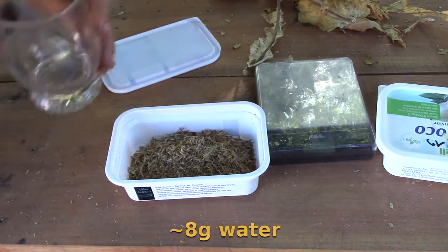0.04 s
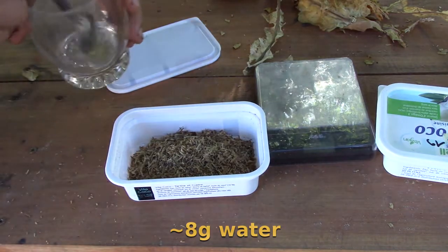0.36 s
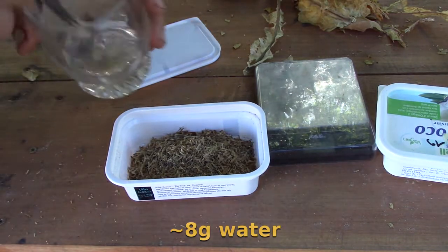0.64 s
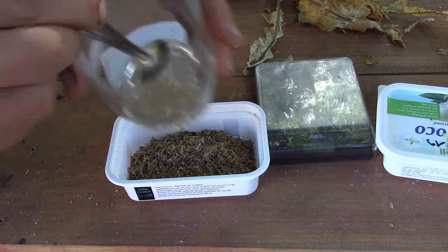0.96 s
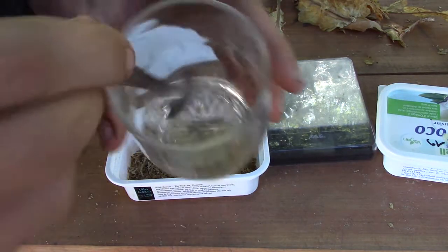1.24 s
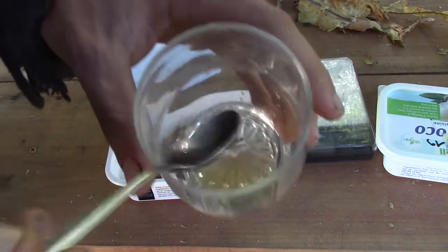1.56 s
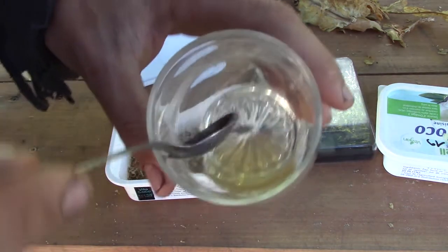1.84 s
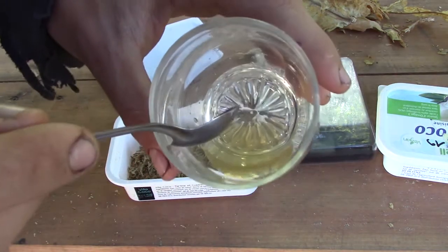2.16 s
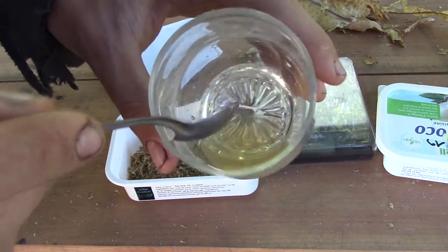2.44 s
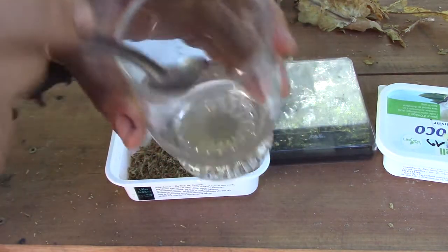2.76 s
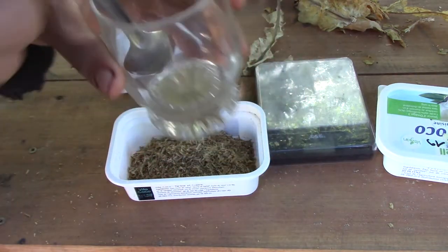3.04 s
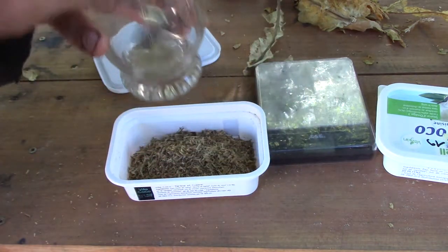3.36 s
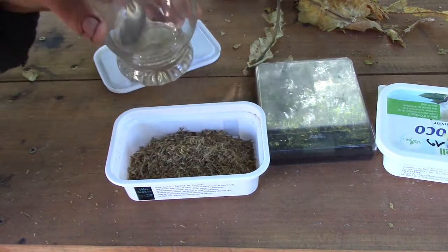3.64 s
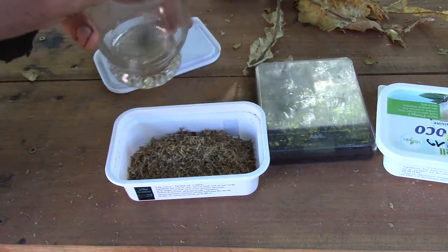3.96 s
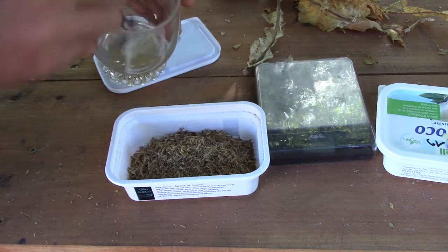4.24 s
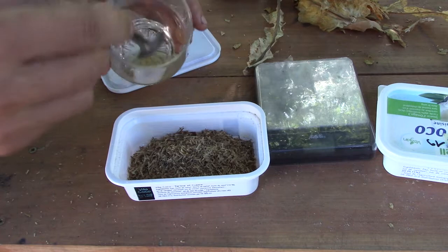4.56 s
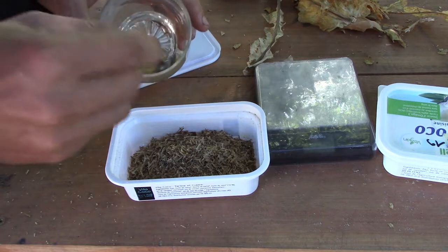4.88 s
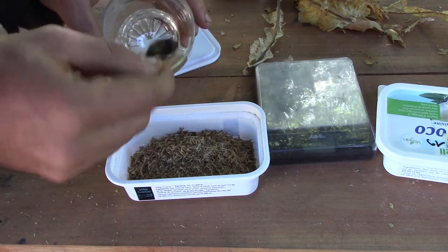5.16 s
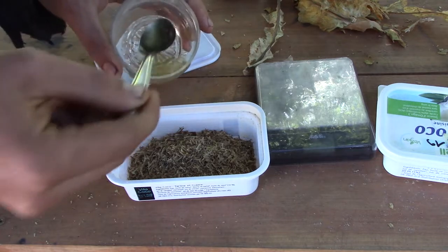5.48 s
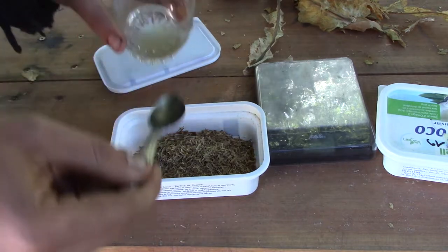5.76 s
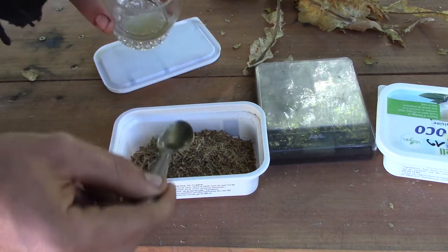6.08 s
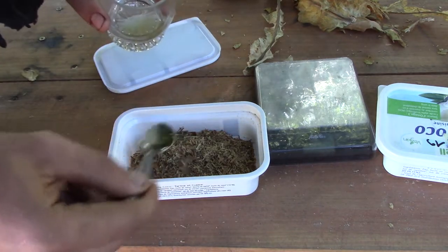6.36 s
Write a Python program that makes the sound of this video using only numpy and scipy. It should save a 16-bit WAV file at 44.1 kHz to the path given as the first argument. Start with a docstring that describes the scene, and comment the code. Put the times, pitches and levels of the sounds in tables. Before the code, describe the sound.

A steel teaspoon stirs a little water in a small hand-held glass. Quick, sharp taps on the base grow louder, mixed with short scrapes and pings. A few lighter clinks and rubs on the wall follow, then a second, softer run of taps with tiny wet ticks and bubbles, and one last faint clink. The sound is close and dry, outdoors, over a faint steady murmur of air.

```python
"""Outdoors, over a wooden table: a steel teaspoon stirs a small hand-held glass of water. The spoon's bowl taps
the thick base, skids, drags across it and slips free with a ping. The handle clinks and rubs on the wall and
rim, which the hand damps. Blows ring decaying modes; stick-slip drives the same modes. The water gives a few
tiny bubbles, and small clicks tick on the glass. Behind it all lies a steady distant murmur of air with a faint
hum."""
import sys
import numpy as np
from scipy import signal
from scipy.fft import rfft, irfft, next_fast_len
from scipy.io import wavfile

SR = 44100
rng = np.random.default_rng(int(sys.argv[2]) if len(sys.argv) > 2 else 0)


def master(y):
    """Save y as 16-bit WAV."""
    cut = np.clip(np.atleast_2d(y).T, -1, 1)
    pcm = np.round(cut * 32767)  # scale
    wavfile.write(sys.argv[1], SR, pcm.astype(np.int16))


N = 282681
RING_TIME_S = np.arange(SR // 6) / SR

# bowl hits base: (time [s], level [dB], tilt [dB/oct], pitch [x], grip looseness [x t60],
# spoon knock [dB], spoon ping [dB], bounce delay [ms], bounce strength [0-1])
BASE_TAPS = [(0.062, -25, -1, 0.99, 1.4, -42, -58, 1.43, 0.04),
             (0.2978, -19.5, -1, 1.0, 0.72, -50, -70, 1.41, 0.67),
             (0.5868, -22, 4, 1.065, 0.73, -23, -18, 1.036, 0.3),
             (0.7438, -10, 0, 1.015, 0.68, -21.5, -32, 1.51, 0.3),
             (0.92, -8.5, 1.5, 1, 0.83, -15.5, -39, 0.708, 0.38),
             (1.1071, -13.5, 1.5, 1.017, 0.54, -27, -37.5, 1.55, 0.45),
             (3.2407, -19, -0.5, 1.075, 0.97, -39, -42, 1.3, 0.8),
             (3.4069, -25, 4, 1.037, 0.86, -57, -31.5, 1.065, 0.3),
             (3.517, -21.5, -1, 1.04, 0.85, -39, -53, 1.337, 0.52),
             (3.6816, -26.5, 0, 1.01, 1, -36, -39, 1.16, 0), (3.873, -30, -0.4, 1, 0.82, -39, -63, 0.84, 0),
             (4.0703, -27.5, 1, 0.97, 1.28, -44, -52, 1.43, 0.45)]
# bowl pressed on the base: (frequency [Hz], level [dB], t60 [s])
BOWL_MODES = [(1587, 1.5, 0.0015), (2635, -9, 0.011), (2976, -20, 0.0357), (3580, 3, 0.0034),
              (4293, 1.5, 0.013), (5270, -19, 0.049), (6086, -10.5, 0.008), (6688, -15.5, 0.024),
              (7720, -6.5, 0.012), (8480, -22, 0.01), (9100, -14, 0.0073), (10236, -11.5, 0.029),
              (11310, -5, 0.014), (12070, -34, 0.0054), (13200, -9.5, 0.006)]
# glass wall: (frequency [Hz], level [dB], t60 [s])
WALL_MODES = [(1360, -30, 0.028), (1906, -24, 0.072), (2270, -23, 0.035), (2560, -7, 0.064),
              (2877, 2, 0.011), (3310, -5, 0.055), (3450, -20, 0.014), (3595, -5, 0.085),
              (3660, 13.5, 0.0028), (4890, -10.5, 0.061), (5110, -14, 0.092), (6460, -2.5, 0.058),
              (6860, -3, 0.016), (7980, 4.5, 0.0029), (8780, -13.5, 0.067), (10190, -3.5, 0.045),
              (10870, -13, 0.09), (11070, 0.5, 0.023), (13380, -13.5, .025), (14970, -13, 0.037)]
# spoon bending, rows knock, ping, top tone: (frequency [Hz], t60 [s])
SPOON_MODES = [(790, 0.014), (2887, 0.061), (5025, 0.084)]
# rim bending: (frequency [Hz], t60 [s])
RIM_MODES = [(1680, 0.19), (3515, 0.068)]


def base_taps():
    """The bowl clacks on the base and the spoon bends; a looser grip lifts its top tone."""
    out = np.zeros(N)
    for at_s, db, tilt, pitch, looseness, knock_db, ping_db, delay_ms, strength in BASE_TAPS:
        top_db = db - 13 + 16.5 * np.log2(looseness)
        clack = ring(BOWL_MODES, db, tilt, pitch, t60_scale=looseness)
        bending = bend(SPOON_MODES, [knock_db, ping_db, top_db])
        add(out, at_s, bounced(clack + bending, delay_ms, strength))
    return out


def bounced(blow, delay_ms, strength):
    """Two weaker bounces follow the blow within milliseconds."""
    size = next_fast_len(2 * len(blow))
    khz = np.fft.rfftfreq(size, 1000 / SR)
    bounce = strength * np.exp(-2j * np.pi * khz * delay_ms)
    return irfft(rfft(blow, size) * (1 + bounce + bounce ** 2 / 2), size)[:len(blow)]


def handle_clinks(lift_width=0.051, twin_ratio=1.013, twin_db=-9):
    """The handle strikes the wall; the glass is not quite round, so each wall mode has a twin."""
    # blows: (time [s], level [dB], tilt [dB/oct], t60 [x], frequency the contact point favours [Hz],
    # its lift [dB], low rim mode [dB], high rim mode [dB])
    clinks = [(1.469, -22.5, 2, 1.1, 2650, 1.4, -48, -36), (1.4818, -33.5, -1, 2.4, 2620, 3.6, -45, -41),
              (1.568, -41.5, 1.5, 1.16, 10600, 1.6, -58, -62),
              (1.6741, -41.5, 2.5, 0.95, 3620, 5.7, -54, -33),
              (2.5444, -27.5, 2, 0.87, 6450, 5.6, -51, -32), (2.9565, -55, -6, 0.85, 3120, 4, -37, -37),
              (2.9752, -51.5, -18, 0.84, 3070, 4, -40, -31.5),
              (3.0882, -36.5, 1, 0.85, 3120, 4, -38.5, -28),
              (4.9323, -42.5, -2.5, 0.51, 10140, 20.7, -65.5, -40)]
    out = np.zeros(N)
    hz, mode_db, t60_s = np.transpose(WALL_MODES)
    for at_s, db, tilt, t60_scale, favoured_hz, lift_db, *rim_db in clinks:
        lifted_db = mode_db + lift_db * np.exp(-(np.log(hz / favoured_hz) / lift_width) ** 2)
        modes = np.transpose([hz, lifted_db, t60_s])
        twins = np.transpose([hz * twin_ratio, lifted_db + twin_db, t60_s])
        wall = ring(np.vstack([modes, twins]), db, tilt, t60_scale=t60_scale)
        add(out, at_s, wall + bend(RIM_MODES, rim_db))
    return out


def release_pings(rise_s=0.0033, t60_s=0.053):
    """The spoon slips free and sings in one bending mode."""
    # slips: (time [s], level [dB], frequency [Hz])
    releases = [(0.782, -36, 2880), (0.999, -26.5, 2865), (1.178, -22, 2850), (3.421, -25.5, 2887),
                (3.603, -34.5, 2826), (3.784, -35, 2930), (4.077, -24.5, 5047)]
    out = np.zeros(N)
    onset = 1 - np.exp(-RING_TIME_S / rise_s)
    for at_s, db, hz in releases:
        add(out, at_s, ring([(hz, db, t60_s)]) * onset)
    return out


def base_slides(skid_rise_s=0.008, skid_fall_s=0.075, skid_tilt=-2.1, drag_rise_share=0.58):
    """The bowl skids after each tap and drags over the base between taps."""
    # drags: (peak time [s], length [s], level [dB], tilt [dB/oct], spoon knock [relative dB])
    drags = [(-0.007, 0.16, -36.5, -1, -24), (0.169, 0.11, -49, 3, 2), (0.782, 0.062, -43, -15, 19),
             (0.977, 0.13, -39, -1, 2), (1.17, 0.08, -34.5, -1.5, -3), (3.345, 0.085, -47, -5, -7),
             (3.403, 0.054, -42, -13, 12), (3.455, 0.079, -50, -4, -11), (3.584, 0.11, -43, -1.5, -1),
             (3.78, 0.054, -37, -1.5, -26), (3.971, 0.089, -41.5, -2.5, -7), (4.153, 0.1, -42.5, 3, -14)]
    strokes = []
    for at_s, db, tilt, *_ in BASE_TAPS:
        skid_db = -38.5 + 0.47 * db - 1.5 * tilt  # strong blows skid more, bright ones spring off
        strokes.append((at_s + skid_rise_s, skid_rise_s, skid_fall_s, skid_db, skid_tilt, (-18, -28)))
    for peak_s, length_s, db, tilt, knock_db in drags:
        rise_s = length_s * drag_rise_share
        strokes.append((peak_s, rise_s, length_s - rise_s, db, tilt, (knock_db, knock_db - 4)))
    return friction(strokes, BOWL_MODES, SPOON_MODES, catches_per_s=1500, spread_db=5.5, chatter_db=3.5,
                    flatten=0.3, grit=0.3, t60_scale=1.0, wander=0.041, patchy_db=4.0)


def wall_rubs(rise_share=0.16):
    """The handle rubs the wall, biting at once and dying away."""
    # rubs: (peak time [s], length [s], level [dB], tilt [dB/oct], high rim mode [relative dB])
    rubs = [(1.493, 0.06, -30, -5, -25), (1.576, 0.086, -48.5, -3, -27), (1.843, 0.2, -63, 0, -3),
            (2.022, 0.024, -47.5, -12, -1), (2.313, 0.017, -53, -11, -2), (2.977, 0.12, -45.5, 1.5, 5)]
    strokes = []
    for peak_s, length_s, db, tilt, rim_db in rubs:
        rise_s = length_s * rise_share
        strokes.append((peak_s, rise_s, length_s - rise_s, db, tilt, (rim_db - 11.5, rim_db)))
    return friction(strokes, WALL_MODES, RIM_MODES, catches_per_s=3000, spread_db=3.5, chatter_db=3.0,
                    flatten=0.4, grit=0.076, t60_scale=0.16, wander=0.033, patchy_db=6.5)


def friction(strokes, modes, bending_modes, catches_per_s, spread_db, chatter_db, flatten, grit,
             t60_scale, wander, patchy_db, depth_db=20.5):
    """Steel sticks and slips on glass; the moving contact shifts the modes' pitch and strength."""
    out = np.zeros(N)
    hz, mode_db, t60_s = np.transpose(modes)
    sizes = gain_of(spread_db * np.minimum(rng.exponential(1, N), 3)) * rng.choice([-1, 1], N)
    catches = sizes * (rng.random(N) < catches_per_s / SR) + 0.35 * rng.standard_normal(N)
    catches *= gain_of(chatter_db * drift(rate_hz=110))
    patch_samples = SR // 140
    scatter = rng.standard_normal((len(strokes), 24, 2, len(hz)))  # stroke, patch, pitch/level, mode
    for (peak_s, rise_s, fall_s, db, tilt, bending_db), patches in zip(strokes, scatter):
        span = np.arange(max(round((peak_s - rise_s) * SR), 0), round((peak_s + fall_s) * SR))
        from_peak = np.maximum((peak_s - span / SR) / rise_s, (span / SR - peak_s) / fall_s)
        envelope = gain_of(db - depth_db * from_peak) * signal.windows.tukey(len(span), 0.1)
        force = unit_rms(catches[span]) * envelope
        bending = bend(bending_modes, bending_db)
        patches = (patches + patches[-1]) / np.sqrt(2)  # each stroke keeps its own colour
        for start, (shift, swell) in zip(range(0, len(force), patch_samples), patches):
            patch_hz = hz * (1 + wander * shift)
            patch_db = mode_db * (1 - flatten) + patchy_db * swell
            patch_modes = np.transpose([patch_hz, patch_db, t60_s])
            response = ring(patch_modes, tilt=tilt, t60_scale=t60_scale) + bending
            response /= np.linalg.norm(response)
            response[:2] += grit * np.array([1, -1])  # treble hiss of the contact
            add(out, span[start] / SR, signal.fftconvolve(force[start:start + patch_samples], response))
    return out


def ring(modes, db=0, tilt=0, pitch=1, t60_scale=1):
    """Struck modes, alternating in sign; harder contact tilts them to the treble [dB/oct]."""
    hz, mode_db, t60_s = np.transpose(modes)[:, :, None]
    signs = (-1) ** np.arange(len(hz))[:, None]
    gains = signs * gain_of(db + mode_db + tilt * np.log2(hz / 4200))
    tones = np.sin(2 * np.pi * hz * pitch * RING_TIME_S)
    return (gains * decay(t60_s * t60_scale) * tones).sum(0)


def bend(modes, levels_db):
    """Bending modes, at levels that depend on the contact point."""
    return ring([(hz, db, t60_s) for (hz, t60_s), db in zip(modes, levels_db)])


def radiated(x, low_hz=560, high_hz=12500):
    """A small body radiates little bass; finite contact time rounds off the top."""
    x = signal.sosfilt(signal.butter(2, low_hz, "high", fs=SR, output="sos"), x)
    return signal.sosfilt(signal.butter(2, high_hz, fs=SR, output="sos"), x)


def glass_clicks(t60_s=0.00248, log_width=0.95, faint_until_s=3.1, samples=1024):
    """Small clicks on the glass: broad noise clicks, among them the spoon's brief re-catches and a dull knock
    with the last handle clink, plus six faint ones at random."""
    # clear ticks: (time [s], level [dB], centre [Hz])
    clear = [(.086, -33, 4500), (.121, -29.5, 6400), (.13, -34, 6000), (.89, -32.5, 8000),
             (1.404, -27.5, 9000), (1.544, -30, 3500), (2.933, -40.5, 5900), (3.532, -30, 5950),
             (3.752, -34, 5000), (3.956, -28.5, 4400), (4.206, -36, 6300), (4.932, -29.5, 1200)]
    faint = [(faint_until_s * when, -39.5 - 16 * softness, 5000 * 2 ** (colour - 0.5))
             for when, softness, colour in rng.random((6, 3))]
    out = np.zeros(N)
    hz = np.fft.rfftfreq(samples, 1 / SR)
    for at_s, db, centre_hz in clear + faint:
        band = np.exp(-(np.log((hz + 1) / centre_hz) / log_width) ** 2)
        click = irfft(rfft(rng.standard_normal(samples)) * band) * decay(t60_s)[:samples]
        add(out, at_s, gain_of(db) * click / abs(click).max())
    return out


def bubbles():
    """Air pockets ring in the water and glide as their depth changes."""
    # bubbles: (time [s], length [s], level [dB], start [Hz], end [Hz])
    pockets = [(0.538, 0.027, -51.5, 1920, 3200), (3.326, 0.023, -50, 3440, 3760),
               (3.779, 0.0093, -34, 4210, 3620), (3.98, 0.025, -42.5, 3800, 3130)]
    out = np.zeros(N)
    for at_s, length_s, db, start_hz, end_hz in pockets:
        hz = np.linspace(start_hz, end_hz, round(length_s * SR))
        add(out, at_s, gain_of(db) * signal.windows.tukey(len(hz), 0.7) * sine(hz))
    return out


def reflections(x, wet_db=-15.5, t60_s=0.031, width=0.3007, delay_s=0.0027):
    """Hands and nearby surfaces scatter a short, weak stereo tail."""
    mid, side = rng.standard_normal((2, len(RING_TIME_S))) * (RING_TIME_S > delay_s) * decay(t60_s)
    tail = np.array([mid + width * side, mid - width * side])
    tail /= np.linalg.norm(tail[0])
    return gain_of(wet_db) * signal.fftconvolve(x[None], tail, axes=1)[:, :N]


def distant_air(level_db=-57.5):
    """Outdoor murmur, nearly alike in both ears through the midrange."""
    # noise spectrum: (frequency [Hz], density [relative dB])
    spectrum = [(15, -73.5), (25, -29.5), (90, -17), (128, -14), (160, -6), (270, -6.5), (480, -9),
                (880, -15), (1130, -18), (1330, -15.5), (1900, -22), (3700, -25.5), (4700, -27),
                (6000, -28.5), (16000, -41.5)]
    # left-right likeness: (frequency [Hz], correlation [0-1])
    likeness = [(60, 0.45), (150, 0.93), (380, 0.85), (950, 0.83), (2380, 0.83), (5980, 0.26), (15000, 0.5)]
    hz = np.fft.rfftfreq(N, 1 / SR)
    mid, side = rfft(rng.standard_normal((2, N))) * gain_of(log_interp(spectrum, hz))
    correlation = log_interp(likeness, hz)
    mid *= np.sqrt(1 + correlation)
    side *= np.sqrt(1 - correlation)
    noise = unit_rms(irfft(np.array([mid + side, mid - side]), N))
    return noise * gain_of(level_db + 0.5 * drift(rate_hz=9))


def hum():
    """Three faint low tones waver in level and pitch."""
    # hum tones: (frequency [Hz], rms level [dB])
    tones = [(221.6, -70), (272.2, -73), (112.6, -82.5)]
    out = np.zeros(N)
    for hz, db in tones:
        amplitude = np.sqrt(2) * gain_of(db + 3.4 * drift(rate_hz=1.7))
        out += amplitude * sine(hz + 2.5 * drift(rate_hz=6))
    return out


def gain_of(db):
    return 10 ** (np.asarray(db) / 20)


def unit_rms(x):
    return x / np.sqrt(np.mean(x ** 2) + 1e-20)


def decay(t60_s):
    return np.exp(-np.log(1000) * RING_TIME_S / t60_s)


def sine(hz):
    return np.sin(2 * np.pi * np.cumsum(hz) / SR)


def log_interp(points, hz):
    point_hz, values = np.transpose(points)
    return np.interp(np.log(hz + 1), np.log(point_hz + 1), values)


def drift(rate_hz):
    """Smooth random curve, rms 1."""
    hz = np.fft.rfftfreq(N, 1 / SR)
    return unit_rms(irfft(rfft(rng.standard_normal(N)) * np.exp(-(hz / rate_hz) ** 2), N))


def add(mix, at_s, sound):
    part = mix[max(round(at_s * SR), 0):][:len(sound)]
    part += sound[:len(part)]


def scene():
    """Glass, reflections and background, all slightly left of centre."""
    contacts = base_taps() + handle_clinks() + release_pings() + base_slides() + wall_rubs()
    glass = radiated(contacts) + glass_clicks() + bubbles()
    return (glass + reflections(glass) + distant_air() + hum()) * gain_of([[0.28], [-0.28]])


def record(dry, cutoff_hz=16000):
    """Steep low-pass band limit."""
    lowpass = signal.firwin(511, cutoff_hz, window=("kaiser", 9), fs=SR)
    return signal.oaconvolve(dry, lowpass[None], "same")


dry = scene()
out = record(dry)
master(out)
```